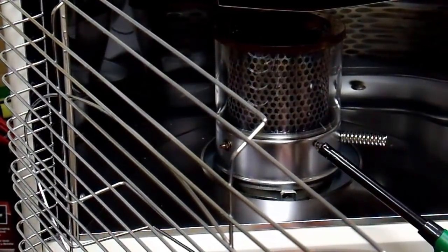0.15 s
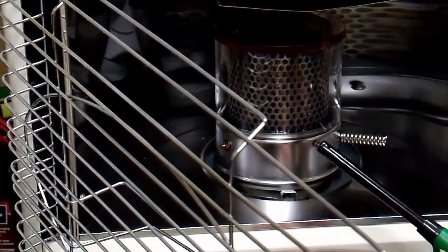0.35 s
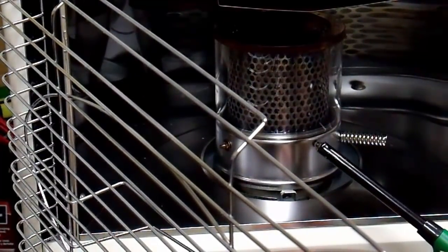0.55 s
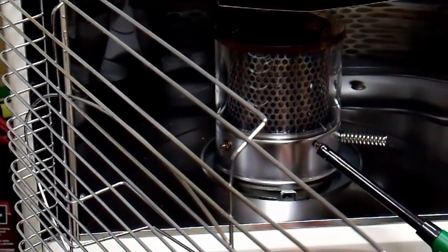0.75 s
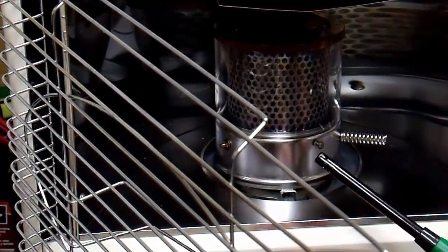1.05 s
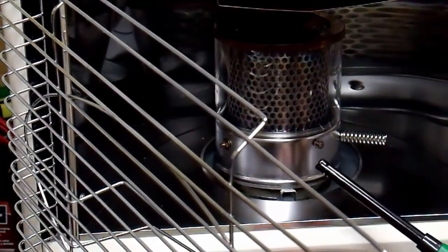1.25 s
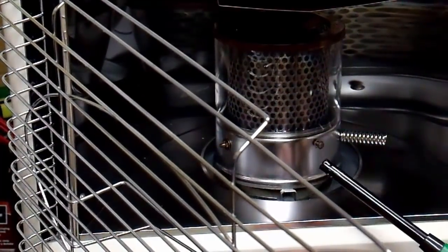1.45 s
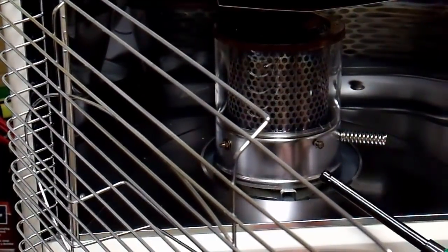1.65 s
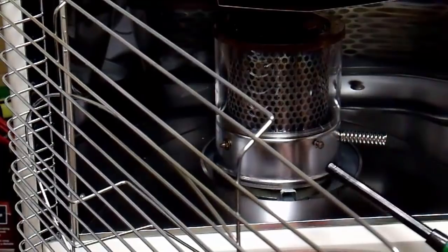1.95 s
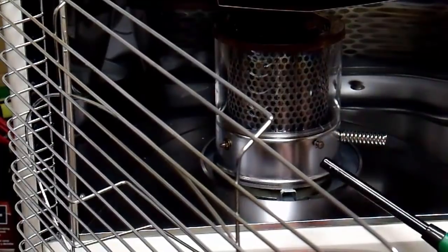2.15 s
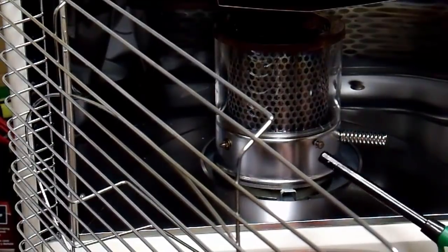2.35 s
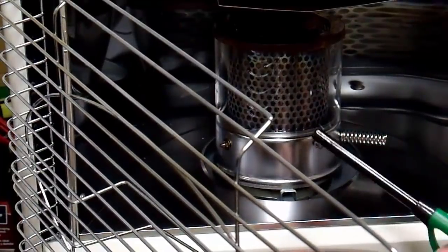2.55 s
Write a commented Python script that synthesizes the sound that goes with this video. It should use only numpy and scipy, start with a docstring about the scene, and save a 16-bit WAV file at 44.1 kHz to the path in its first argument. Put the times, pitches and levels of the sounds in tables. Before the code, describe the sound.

Close, slightly clipped snaps of a lighter's igniter come at a quickening pace, with faint trigger ticks between them; a hard-walled garage answers each with a short bright tail over faint hiss.

```python
"""A long-necked gas lighter close to the microphone in a bare garage: its piezo hammer snaps nine times.
Each snap is a set of ringing body modes plus a broadband rattle, loud enough to clip the input, and
the garage answers with decaying noise. The trigger ticks as it slides back and forth: short noise
bursts with a resonance each. Near walls echo both; faint hiss, rumble and hum lie underneath.
"""
import sys
import numpy as np
from scipy import signal
from scipy.fft import rfft, irfft, next_fast_len
from scipy.io import wavfile

SR = 44100
rng = np.random.default_rng(int(sys.argv[2]) if len(sys.argv) > 2 else 0)


def transcribe(signal):
    """Save signal, clipped to [-1, 1], as a 16-bit WAV file at the path in sys.argv[1]."""
    frames = np.atleast_2d(signal).T
    limited = np.clip(frames, -1, 1)
    pcm = np.round(limited * 32767).astype(np.int16)
    wavfile.write(sys.argv[1], SR, pcm)


def volts(x):
    """Linear amplitude factor 10**(x/20) for a level x in dB, scalar or array-like."""
    e = np.asarray(x, float) / 20
    return 10 ** e


N = 119070  # samples, 2.7 s


def unit(x):
    """Scaled to rms 1."""
    return x / np.sqrt(np.mean(x ** 2) + 1e-20)


def along(points, hz):
    """Interpolates (f/Hz, value) points on a log frequency axis."""
    f, value = np.transpose(points)
    return np.interp(np.log(hz + 1), np.log(f + 1), value)


def coloured(x, points):
    """x through the causal, minimum-phase filter with the gain of the (f/Hz, gain/dB) points."""
    m = 2 * next_fast_len(len(x) // 2 + 4096)
    gain = volts(along(points, np.fft.rfftfreq(m, 1 / SR)))
    cepstrum = irfft(np.log(gain + 1e-6), m)
    # folding the cepstrum onto positive time makes the filter causal
    cepstrum[1:m // 2] *= 2
    cepstrum[m // 2 + 1:] = 0
    return irfft(rfft(x, m) * np.exp(rfft(cepstrum)), m)[:len(x)]


def fade(t, t60, rise, hold=0):
    """Quick rise, a hold, then exponential decay by 60 dB per t60 (all in s)."""
    return volts(-60 * np.maximum(t - hold, 0) / t60) * (1 - np.exp(-t / rise))


def add(track, s, sound):
    """Mixes a sound in at time s."""
    track[round(s * SR):][:len(sound)] += sound


def snaps():
    """Each blow rings the body much the same way; returns the direct sound and the garage's answer."""
    # hammer snaps: t/s, direct level/dB before the drive, rms level/dB of the garage's answer
    blows = [(0.2085, 6, -34.5), (0.605, 5, -34.5), (0.9408, 6, -34), (1.264, 3.5, -35), (1.5135, 6, -34.5),
             (1.7244, 3, -34), (1.9222, 4.5, -34.5), (2.1366, 7, -34), (2.3645, 7.5, -34.5)]
    # modes of the lighter body: mean f/Hz, mean level/dB, t60/s, rise/s, hold/s while the hammer chatters
    body = [(1750, -13, .012, .0003, .002), (2950, -5, .016, .0006, .0035), (3400, 0, .016, .0015, .004),
            (4400, -9, .01, .0006, .003), (4900, -8, .01, .0004, .0035), (5800, -2.5, .012, .0006, .003),
            (6500, -10, .01, .0006, .003), (8800, -8, .008, .0003, .001), (11300, -12, .008, .0003, .002)]
    # colour of the hammer's broadband rattle: f/Hz, relative level/dB per Hz
    crack = [(500, -28), (900, -36.5), (1350, 3), (2400, -14.5), (3800, -7.5), (5400, 4), (7500, -4),
             (10000, -1), (12000, -13.5), (14000, -1), (15500, -30), (17000, -25.5)]
    # colour of the garage's answer: f/Hz, gain/dB
    garage = [(500, -46), (900, -27.5), (1250, -15), (1550, -9.5), (1900, -9), (2050, -1), (2250, 0),
              (2500, -5.5), (2800, 0), (3050, -9), (3180, 6), (3270, 5), (3400, -0.5), (3600, -6),
              (4100, -8), (4800, -7.5), (5600, -3), (6400, -4.5), (7000, -12.5), (8800, -13),
              (10000, -10.5), (12500, -15.5), (14000, -22), (15600, -21), (16200, -48), (17000, -102)]
    # how much each mode differs from snap to snap; scatter_rad also varies the rattle
    scatter_db, scatter_rad, scatter_pitch = 2.5, .8, .015  # dB, rad, fraction of f
    drive_db = -15  # added to the direct level of every snap
    crack_db, crack_t60, crack_rise_s, crack_hold_s = 3, 0.017, 0.00014, 0.0011
    shift = .15  # share of the answer's power that changes as the hand moves

    near, far = np.zeros(N + SR), np.zeros(N + SR)
    t = np.arange(SR // 20) / SR
    hz, db, t60, rise, hold = np.transpose(body)[:, :, None]
    # what all snaps have in common
    phase = rng.uniform(0, 2 * np.pi, hz.shape)
    rattle = rng.standard_normal(len(t))
    room = tail()
    for s, level_db, far_db in blows:
        size, turn, bend = rng.standard_normal((3, *hz.shape))
        pitch = hz * (1 + scatter_pitch * bend)
        waves = np.sin(2 * np.pi * pitch * t + phase + scatter_rad * turn)
        ring = np.sum(volts(db + scatter_db * size) * fade(t, t60, rise, hold) * waves, 0)
        noise = unit(coloured(rattle + scatter_rad * rng.standard_normal(len(t)), crack))
        noise = volts(crack_db) * noise * fade(t, crack_t60, crack_rise_s, crack_hold_s)
        add(near, s, volts(level_db + drive_db) * (ring + noise))
        answer = coloured(np.sqrt(1 - shift) * room + np.sqrt(shift) * tail(), garage)
        add(far, s, volts(far_db) * unit(answer))
    return near[:N], far[:N]


def ticks():
    """Trigger ticks: short plastic rattles of coloured noise, each with a resonance of its own."""
    # trigger ticks: t/s, relative level/dB, resonance f/Hz, t60/s
    clicks = [(0.4526, -38, 3900, 0.015), (0.4614, -24, 4440, 0.017), (0.5422, -30, 7260, 0.005),
              (0.8184, -34, 4520, 0.019), (0.8222, -22, 4360, 0.02), (0.8988, -31.5, 7000, 0.019),
              (1.1303, -22.5, 5340, 0.013), (1.1362, -23, 4700, 0.02), (1.2228, -28.5, 4440, 0.014),
              (1.231, -32, 5660, 0.015), (1.4265, -23.5, 3820, 0.014), (1.4313, -21, 4300, 0.024),
              (1.4772, -31, 4400, 0.015), (1.6415, -24, 5100, 0.015), (1.6482, -20.5, 4340, 0.019),
              (1.6914, -29.5, 5650, 0.013), (1.8584, -20, 4470, 0.013), (2.0603, -20.5, 3800, 0.015),
              (2.0675, -19.5, 4560, 0.015), (2.2891, -17, 6940, 0.016), (2.2955, -17.5, 6410, 0.019),
              (2.3004, -17.5, 3610, 0.011), (2.3094, -41, 3850, 0.015), (2.335, -34, 6130, 0.015),
              (2.5595, -14.5, 6900, 0.012), (2.5677, -40, 7500, 0.013), (2.5786, -28, 7310, 0.015)]
    # colour of the plastic rattle: f/Hz, relative level/dB per Hz
    plastic = [(500, -86), (900, -9), (1300, -4), (2500, 3.5), (4500, 2.5), (7200, -1), (11000, -2),
               (14000, -9.5), (15800, -20), (17000, -24)]
    all_db, ring_db = -5.5, -4  # gain of all ticks; resonance relative to the rattle
    rise_s, hold_s = .0007, .002

    out, t = np.zeros(N + SR), np.arange(SR // 20) / SR
    for s, db, hz, t60 in clicks:
        rattle, excitation = rng.standard_normal((2, len(t)))
        ring = signal.lfilter(*signal.iirpeak(hz, 10, SR), excitation)  # Q of 10
        sound = unit(coloured(rattle, plastic)) + volts(ring_db) * unit(ring)
        add(out, s, volts(db + all_db) * sound * fade(t, t60, rise_s, hold_s))
    return out[:N]


def wall_echoes(direct):
    """Near surfaces return delayed copies of the direct sound with their treble partly swallowed."""
    # near walls: delay t/s, level/dB
    walls = [(.0082, -13), (.0115, -19), (.016, -23.5)]
    # colour left by the soft near surfaces: f/Hz, gain/dB
    soft_wall = [(1000, 2.5), (3600, -1), (4500, -14), (16000, -0.5)]
    reflected = coloured(direct, soft_wall)
    return sum(volts(db) * np.pad(reflected, (round(s * SR), 0))[:N] for s, db in walls)


def tail():
    """The garage's diffuse answer: a fast first part, then each frequency dying at its own speed."""
    # decay of the garage: f/Hz, t60/s
    decay = [(500, 0.22), (1300, 0.84), (3500, 0.67), (6000, 0.61), (9200, 0.44), (16000, .35)]
    near_db, near_t60 = 12.5, 0.071  # near walls that die first: starting level over the rest, s
    gap_s = .007  # time the answer takes to build

    hz, t, z = signal.stft(rng.standard_normal(SR), SR, nperseg=256)
    fading = z * volts(-60 * t / along(decay, hz)[:, None])
    answer = signal.istft(fading, SR, nperseg=256)[1][:SR]
    t = np.arange(SR) / SR
    early = volts(near_db - 60 * t / near_t60)
    build = 1 - np.exp(-(t / gap_s) ** 2)
    answer = answer * (1 + early) * build
    return answer / np.linalg.norm(answer)


def floor():
    """Steady noise shaped into hiss, low rumble and a few narrow bands, plus a sine of mains hum."""
    # colour of the background: f/Hz, relative level/dB per Hz
    background = [(15, 4), (30, -19.5), (60, -8.5), (85, -22), (120, -16), (180, -26.5), (300, -22),
                  (450, -23.5), (620, -8.5), (730, -18), (930, -4.5), (1060, -20.5), (1300, -3),
                  (1460, -15.5), (1800, -8), (2300, 1.5), (2900, -11.5), (3400, -5), (4100, -17),
                  (4800, -15.5), (6000, -16), (7000, -12), (7500, -26), (7800, -6), (7920, -3.5),
                  (8050, -21), (12000, -14), (12700, -18), (13300, -18), (15600, -27), (16000, -19),
                  (17000, -59)]
    hiss_db = -50.5  # rms
    hum_hz, hum_db = 60, -84.5  # Hz, dB rms
    hum = volts(hum_db) * np.sqrt(2) * np.sin(2 * np.pi * hum_hz * np.arange(N) / SR)
    return volts(hiss_db) * unit(coloured(rng.standard_normal(N), background)) + hum


def scene():
    """Snaps and ticks, their echoes, the garage and the floor, summed at the microphone."""
    near, far = snaps()
    tick = ticks()
    direct = near + tick
    tick_answer = volts(-9.5) * signal.fftconvolve(tick, tail())[:N]
    wet = far + tick_answer
    return (direct + wall_echoes(direct) + wet + floor())[None]


def low_pass(x):
    """Removes everything above the highest recorded frequency."""
    return signal.sosfilt(signal.butter(12, 17160, fs=SR, output="sos"), x)


def record(dry):
    """The microphone loses the top, the input clips with a rounded knee and the band ends."""
    # microphone response: f/Hz, gain/dB
    microphone = [(15, 0), (15600, 0), (16100, -14), (17000, -30)]
    clip, knee = .77, 7  # ceiling in amplitude; a higher knee exponent bends more sharply
    top_hz = 16900

    heard = coloured(dry[0], microphone)[None]
    clipped = heard / (1 + np.abs(heard / clip) ** knee) ** (1 / knee)
    in_band = np.fft.rfftfreq(N, 1 / SR) < top_hz
    kept = irfft(rfft(clipped) * in_band, N)
    return low_pass(kept)


dry = scene()
out = record(dry)
transcribe(out)
```